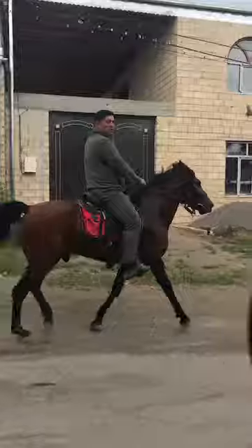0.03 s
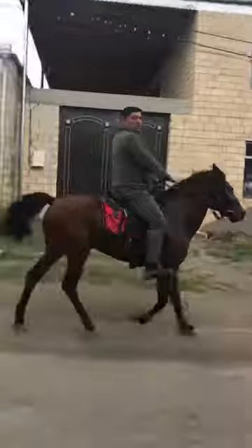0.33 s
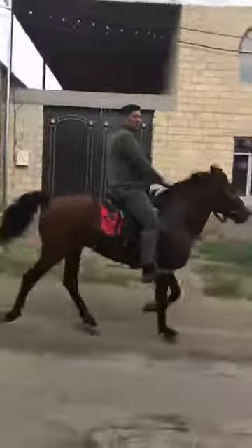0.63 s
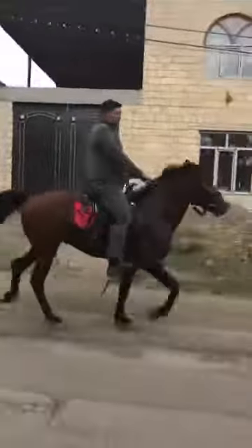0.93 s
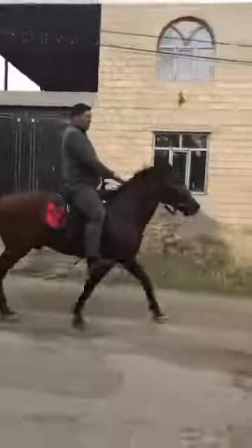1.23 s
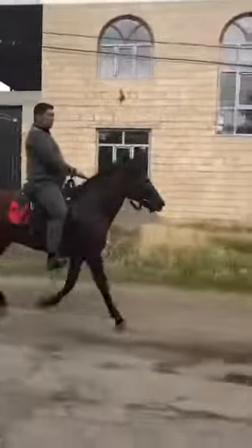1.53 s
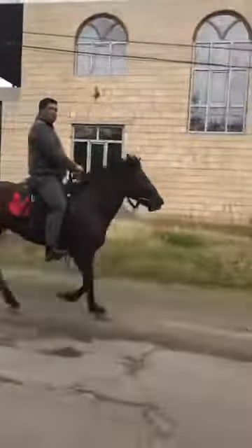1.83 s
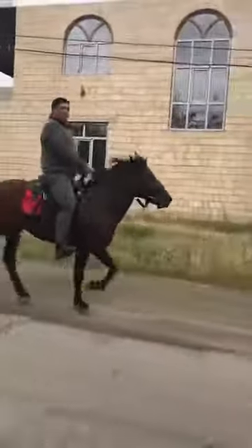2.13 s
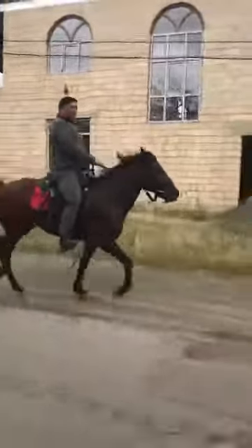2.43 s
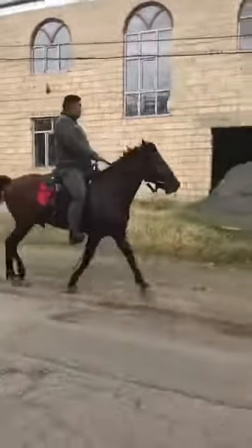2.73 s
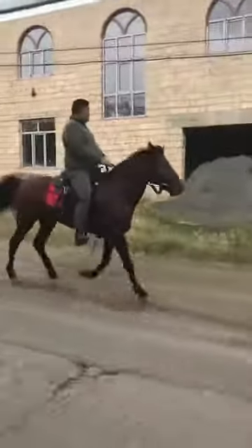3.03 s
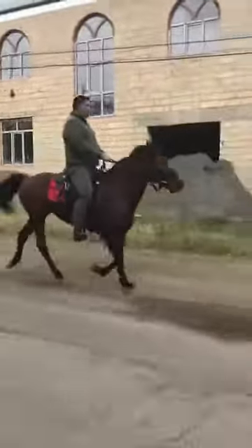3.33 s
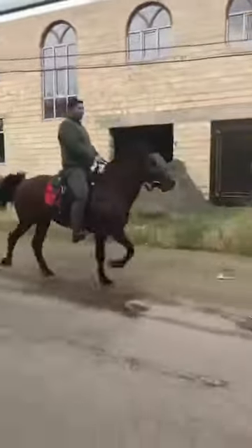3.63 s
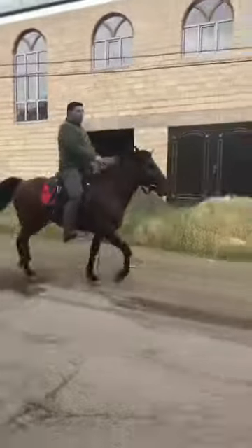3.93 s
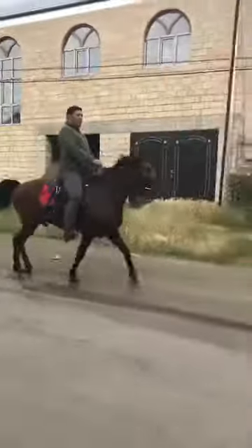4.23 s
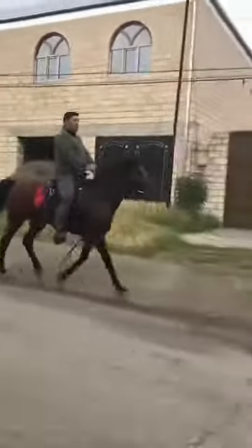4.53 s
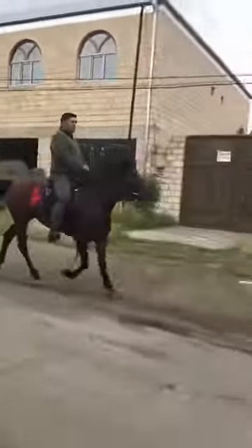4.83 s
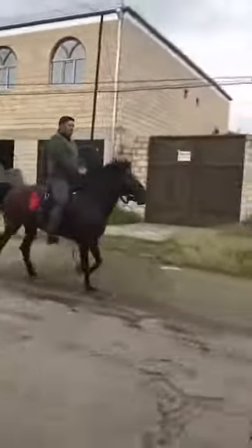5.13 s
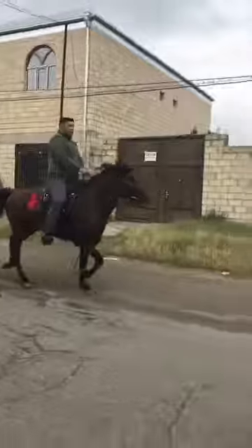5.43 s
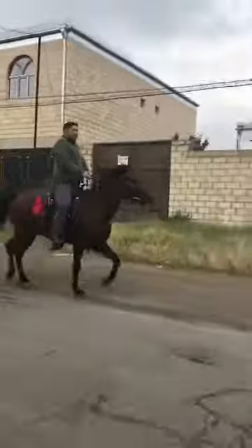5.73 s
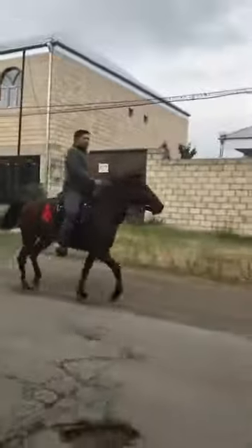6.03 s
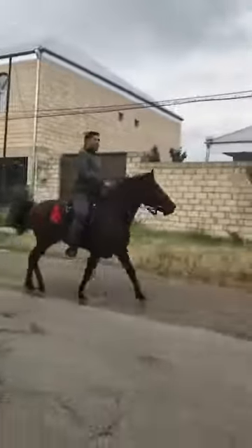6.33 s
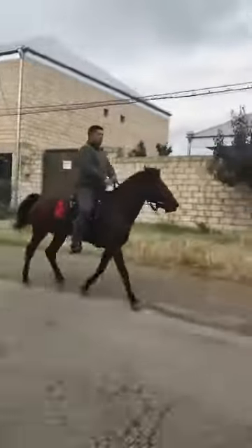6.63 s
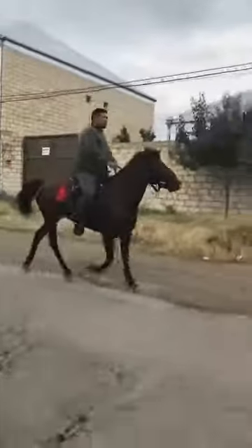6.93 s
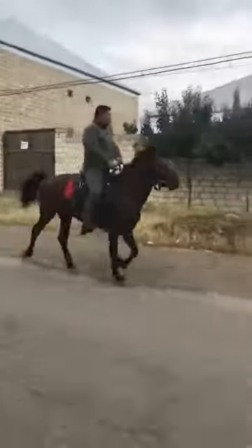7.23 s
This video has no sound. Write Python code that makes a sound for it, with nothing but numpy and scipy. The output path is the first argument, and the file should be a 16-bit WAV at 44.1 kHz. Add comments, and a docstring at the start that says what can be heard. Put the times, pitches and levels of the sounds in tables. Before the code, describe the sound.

From the start, a car's low engine drone and tyre noise run steadily, heard from inside, a little stronger in the first half second. Beside it, a shod horse keeps a quick, even gait on gritty asphalt, with about four closely paired footfalls a second. The steps mix sandy scrapes, hollow knocks and sharp iron clacks, followed by faint ticks of loose stones. A tiny, very high bell jingles in time throughout, and the house fronts add a slight, short echo. Harness buckles snap at about 1, 2.8 and 4 to 4.5 seconds. A small distant bird gives thin, faint whistles between 2.4 and 5 seconds. One clack stands out at 1.5 seconds, and the hooves strike hardest between 6.2 and 6.9 seconds. Soft gusts bump the microphone around 0.5, 5.6 and 6.6 seconds, with a short, hard wind thump at 7.3 seconds.

```python
"""A car drones along a gritty asphalt street, and a shod horse ambles beside it.
From the first step the shoes grind through grit and clack down heel and toe, ringing horn and iron;
loose stones tick back, and a tiny bell on the tack is shaken twice a step.
Soon gusts bump the microphone and harness buckles snap; later a small bird whistles far off.
The house fronts return a short echo, and the hardest gust comes near the end."""
import sys
import numpy as np
from scipy import signal
from scipy.fft import rfft, irfft, next_fast_len
from scipy.io import wavfile
from scipy.ndimage import uniform_filter1d

SR = 44100
rng = np.random.default_rng(int(sys.argv[2]) if len(sys.argv) > 2 else 0)


def store_wav(level_fs):
    """Save 16-bit WAV to argv[1]."""
    pcm = np.round(np.clip(np.atleast_2d(level_fs), -1, 1) * 32767)
    wavfile.write(sys.argv[1], SR, pcm.T.astype(np.int16))


N = 329427


def from_db(db):
    """Decibels to amplitude ratio."""
    return 10 ** (np.asarray(db) / 20)


def rms_one(x):
    """Normalisation to unit power."""
    return x / np.sqrt(np.mean(x ** 2) + 1e-20)


def seconds(size):
    """A time axis."""
    return np.arange(size) / SR


def in_time(rows):
    """Linear interpolation of each column at every sample."""
    s, *columns = np.transpose(rows)
    return [np.interp(seconds(N), s, c) for c in columns]


def add(out, s, sound):
    """Superposition: a sound is mixed in at its time."""
    at = max(int(s * SR), 0)
    out[at:at + len(sound)] += sound[:max(N - at, 0)]


def cut(x, hz, kind, order=2):
    """Butterworth filter."""
    return signal.sosfilt(signal.butter(order, hz, kind, fs=SR, output="sos"), x)


def colour(x, spectrum):
    """Spectral shaping over log frequency, at unit power."""
    hz, db = np.transpose(spectrum)
    size = next_fast_len(len(x))
    log_hz = np.log(np.fft.rfftfreq(size, 1 / SR) + 1)
    gain = from_db(np.interp(log_hz, np.log(hz), db, -80, -80))
    return rms_one(irfft(rfft(x, size) * gain, size)[:len(x)])


def drift(rate, size):
    """Random modulation: Gaussian values, `rate` a second, joined by lines."""
    steps = seconds(size) * rate
    count = int(steps[-1]) + 2
    return np.interp(steps, np.arange(count), rng.standard_normal(count))


def even(x, span_s):
    """Envelope flattening: division by the running RMS."""
    power = np.abs(uniform_filter1d(x ** 2, max(int(span_s * SR), 2)))
    return x / np.sqrt(power + 1e-12)


def grains(per_s, spread_db, size):
    """Shot noise: random clicks of uneven size."""
    sizes = from_db(spread_db * np.minimum(rng.exponential(1, size), 4)) * rng.choice([-1, 1], size)
    return sizes * (rng.random(size) < per_s / SR)


def ring(push, modes, detune, spread_db):
    """Modal synthesis: a push rings damped resonators, each at a slightly random pitch and strength."""
    out = 0
    for hz, db, t60 in modes:
        r = from_db(-60 / (t60 * SR))
        w = 2 * np.pi * hz * np.exp(detune * rng.normal()) / SR
        gain = from_db(db + spread_db * rng.normal()) * rng.choice([-1, 1])
        out = out + gain * signal.lfilter([1, -np.cos(w)], [1, -2 * r * np.cos(w), r * r], push + 1e-18)
    return out


# relative levels of the rolling car: (time [s], cabin drone [dB], tyre roar [dB], street hiss [dB])
CAR_LEVELS = [(0.1, -28, -28, -41.5), (0.3, -31, -33.5, -40), (0.7, -25.5, -35.5, -43),
              (1.5, -32, -35.5, -46.5), (2.4, -28, -40, -47.5), (4.2, -29, -38, -50.5),
              (5.1, -29.5, -38.5, -48), (7.2, -31, -41.5, -50.5)]
# engine firing tone: (time [s], frequency [Hz], level [dB])
FIRING_TONE = [(0.1, 51.07, -24.5), (0.2, 48.37, -21), (0.5, 49.33, -20.5), (0.65, 48.55, -43),
               (1.2, 49.62, -27), (2.3, 52, -33), (7.4, 47, -42)]
# spectra of the cabin and of tyres on asphalt: (frequency [Hz], relative density [dB])
CABIN_SPECTRUM = [(20, -46), (30, -16.5), (40, -5.5), (49, 2.5), (62, -6.5), (85, -8), (120, -19),
                  (170, -17), (300, -29)]
TYRE_SPECTRUM = [(76, -2), (130, -0.5), (291, -5), (462, -12.5), (846, -15), (1060, -14.5), (2090, -22),
                 (3530, -24), (4980, -29.5), (5620, -28), (10300, -38), (11100, -38), (14500, -38),
                 (16000, -50)]


def car(drone_db=-3, tyre_db=1, hiss_db=-1, harmonic_db=-13, split_hz=1200):
    """Cavity resonance: the cabin booms near the firing rate, over the rolling noise of the tyres."""
    drone, tyres, hiss = in_time(CAR_LEVELS)
    hz, engine_db = in_time(FIRING_TONE)
    phase = 2 * np.pi * np.cumsum(hz * (1 + 0.026 * drift(rate=9, size=N))) / SR
    engine = from_db(engine_db) * (np.sin(phase) + from_db(harmonic_db) * np.sin(2 * phase))
    boom = from_db(drone + drone_db) * even(colour(rng.standard_normal(N), CABIN_SPECTRUM), span_s=0.16)
    rolling = colour(rng.standard_normal(N), TYRE_SPECTRUM)
    roar = from_db(tyres + tyre_db) * rms_one(cut(rolling, split_hz, "low"))
    crackle = colour(grains(per_s=12000, spread_db=6, size=N), TYRE_SPECTRUM)
    fizz = from_db(hiss + hiss_db) * rms_one(cut(crackle, split_hz, "high"))
    flicker = from_db(2.3 * drift(rate=66, size=N))
    return engine + boom + roar + fizz * flicker


# the amble lands two hooves in quick succession, and the jolt reaches the bell later; relative levels:
# (time [s], leading scuff [dB], trailing lag [s], trailing scuff [dB], bell lag [s], bell [dB])
GAIT = [(.198, -35.5, 0.062, -38, 0.058, -32), (.447, -38, 0.053, -37.5, 0.11, -34),
        (.688, -38.5, 0.063, -37, 0.056, -32), (0.951, -42.5, 0.054, -39.5, 0.094, -31),
        (1.185, -41, 0.068, -39, 0.053, -34.5), (1.445, -38.5, 0.074, -39.5, 0.082, -30),
        (1.676, -36.5, 0.054, -37, 0.076, -37), (1.932, -39.5, 0.046, -37, 0.04, -37),
        (2.172, -37.5, .056, -38, 0.044, -47), (2.428, -40.5, 0.047, -39.5, 0.09, -27.5),
        (2.669, -42, 0.057, -38.5, 0.078, -36), (2.933, -40.5, 0.045, -43, 0.088, -38),
        (3.170, -39.5, 0.045, -39, 0.083, -43), (3.431, -44, 0.036, -50, 0.1, -38),
        (3.675, -36, 0.036, -40.5, 0.03, -40), (3.935, -40, 0.04, -45.5, 0.043, -35.5),
        (4.189, -35.5, 0.04, -42, 0.024, -45), (4.452, -40.5, 0.033, -42, 0.091, -36.5),
        (4.690, -35.5, 0.034, -38.5, 0.094, -43), (4.964, -40, 0.048, -39.5, 0.085, -41),
        (5.152, -53, 0.055, -32.5, 0.14, -40), (5.406, -47, .058, -35.5, .149, -43),
        (5.721, -35.5, 0.046, -46, 0.047, -44), (5.987, -34, 0.034, -37, 0.11, -38),
        (6.239, -43, .040, -35.5, .108, -39), (6.516, -40.5, 0.023, -40.5, 0.1, -54),
        (6.760, -42, .046, -35, 0.081, -42), (7.046, -40, 0.019, -39, 0.081, -43),
        (7.257, -35, 0.07, -34.5, 0.12, -36.5)]
# fine sand on the road: (time [s], hiss relative to crunch [dB])
SAND_BALANCE = [(0.2, -4), (1.1, 0.5), (2.8, 0), (4.2, -2), (5.0, -6.5), (6.6, -4), (7.3, -5.5)]
# a toe drags over the road: (start [s], end [s], relative crunch [dB], relative hiss [dB])
TOE_DRAGS = [(0.985, 1.04, -43, -38), (3.502, 3.515, -27.5, -31.5), (5.752, 5.778, -33, -43),
             (6.534, 6.575, -33, -41.5), (7.22, 7.299, -41, -35)]


def slides(lead_s=0.018, trail_s=0.046):
    """Sliding contact, twice a step and in each drag: (start [s], end [s], crunch [dB], hiss [dB])."""
    rows = []
    for s, lead_db, lag, trail_db, _, _ in GAIT:
        sand_db = np.interp(s, *np.transpose(SAND_BALANCE))
        for start, length, crunch in (s, lead_s, lead_db), (s + lag, trail_s, trail_db):
            rows.append((start, start + length, crunch, crunch + sand_db))
    return rows + list(TOE_DRAGS)


# spectra of cracking grit and of swept sand: (frequency [Hz], relative density [dB])
GRIT_SPECTRUM = [(300, -16), (650, -3), (1100, 5.5), (1900, 2.5), (3000, 4), (4200, 1.5), (6500, -17.5),
                 (9000, -49), (15000, -64)]
SAND_SPECTRUM = [(3000, -56), (5500, 11.5), (8000, 9.5), (10500, 5), (13000, 5.5), (16000, -2)]


def scuffs(rise_s=0.0015, fall_s=0.006, crunch_db=1, sand_db=1.5, stutter_db=9, patch_db=5):
    """Friction noise: the shoe stutters over the road, cracking coarse grit and sweeping fine sand."""
    out, t = np.zeros(N), seconds(size=6000)
    for start, end, crunch, hiss in slides():
        release = np.exp(-np.maximum(t - (end - start - rise_s), 0) / fall_s)
        slide = (1 - np.exp(-t / rise_s)) * release
        stutter = from_db(stutter_db * np.minimum(drift(rate=180.3, size=len(t)), 1))
        stutter /= np.sqrt(np.average(stutter ** 2, weights=slide ** 2))  # conserves the slide's energy
        road_patch = [(hz, db + patch_db * rng.normal()) for hz, db in GRIT_SPECTRUM]
        grit = stutter * colour(grains(per_s=2200, spread_db=3.3, size=len(t)), road_patch)
        sand = np.sqrt(stutter) * colour(grains(per_s=8000, spread_db=3, size=len(t)), SAND_SPECTRUM)
        add(out, start, slide * (from_db(crunch + crunch_db) * grit + from_db(hiss + sand_db) * sand))
    return out


# loud clacks of a shod hoof, heel or toe:
# (time [s], relative iron clack [dB], relative horn knock [dB], horn pitch [Hz])
HARD_HOOF_STRIKES = [(0.2119, -19.5, -23, 1140), (0.7467, -17, -30, 1280), (0.7785, -19, -30, 1320),
                     (0.8228, -26, -29, 980), (1.0213, -19.5, -35, 1080), (1.1831, -23, -27.5, 770),
                     (1.1986, -23.5, -26, 1330), (1.3024, -26, -38, 1340), (1.4978, -6.5, -34, 1000),
                     (1.6678, -25, -31, 820), (1.7254, -18, -38, 1074), (2.2521, -14, -36, 1000),
                     (2.441, -19, -32, 1270), (2.6602, -21.5, -25, 1040), (2.6797, -19, -42, 1062),
                     (2.7182, -24, -35, 859), (2.7633, -20.5, -31, 1260), (3.0097, -20.5, -27, 1107),
                     (3.1605, -28, -21, 1064), (3.2335, -20.5, -30, 1070), (3.3106, -39, -29, 1040),
                     (3.5027, -19.5, -29.5, 1018), (3.681, -20, -31.5, 1080), (3.9938, -23, -41, 1090),
                     (4.2698, -18, -32.5, 1330), (4.3301, -26.5, -51, 1346), (4.6819, -26.5, -23.5, 920),
                     (5.0245, -26.5, -24.5, 1050), (5.1528, -21, -28.5, 930), (5.222, -26, -25, 1080),
                     (5.7393, -15, -27.5, 944), (5.7774, -35, -30, 1230), (6.0422, -25.5, -45, 1030),
                     (6.2307, -12, -28, 1630), (6.2495, -9, -20.5, 1159), (6.3049, -23, -30, 958),
                     (6.314, -16, -39, 1280), (6.3807, -17, -28.5, 990), (6.4251, -14.5, -24, 1290),
                     (6.5155, -21, -28.5, 990), (6.7478, -6.5, -20.5, 1012), (6.7633, -9.5, -24.5, 1350),
                     (6.8051, -8, -31, 1240), (6.8513, -18, -35, 1310), (7.0655, -19.5, -28.5, 1560),
                     (7.258, -15, -24, 1710), (7.3173, -13.5, -30, 723)]
HORN_HZ = 1037   # the horn's usual pitch


def contacts(soft_lag_s=0.0098, soft_clack_db=-36, soft_knock_db=-39.5, tap_lag_s=.016, tap_loss_db=13):
    """Impacts: every hoof lands softly; a weaker tap follows each hard strike. Columns as above."""
    soft = [(start + soft_lag_s, soft_clack_db, soft_knock_db, HORN_HZ)
            for s, _, lag, *_ in GAIT for start in (s, s + lag)]
    taps = [(s + tap_lag_s * rng.uniform(.75, 1.25), clack - tap_loss_db, knock - tap_loss_db, HORN_HZ)
            for s, clack, knock, _ in HARD_HOOF_STRIKES]
    return soft + list(HARD_HOOF_STRIKES) + taps


# modes of the hoof horn and of the iron shoe: (frequency [Hz], relative level [dB], T60 [s])
HORN_MODES = [(430, -12, .009), (640, -7, .009), (860, -5, .009), (1050, 1, .012), (1270, -4, .008),
              (1680, -11, .005)]
SHOE_MODES = [(2800, 10, 0.0076), (3960, 6, 0.0046), (3910, 9, 0.0044), (5450, -35, 0.0017),
              (5680, 6, 0.0063), (8150, 0, 0.00085)]


def hoof_strikes(crush_s=0.0014, settle_s=0.0056, crack_db=-2, knock_db=-2.3, clack_db=-11.5):
    """Impact excitation: one contact, crushed stones and a short settling ring both horn and shoe."""
    out, t = np.zeros(N), seconds(size=2600)
    attack = t < .005
    crushing = 0.38 * np.exp(-t / crush_s) + 0.072 * np.exp(-t / settle_s)
    for s, clack, knock, pitch in contacts():
        push = rng.standard_normal(len(t)) * crushing
        push[0] += 1  # the contact impulse
        modes = [(hz * pitch / HORN_HZ, db, t60) for hz, db, t60 in HORN_MODES]
        horn = cut(ring(push, modes, detune=.06, spread_db=3), [280, 2000], "band")
        shoe = rms_one(ring(push, SHOE_MODES, detune=.1, spread_db=3))
        crack = from_db(crack_db) * rms_one(cut(push, 6500, "low", order=3))  # stones have no pitch
        iron = cut(shoe + crack, 2400, "high")
        add(out, s, from_db(knock + knock_db) * horn / horn[attack].std())
        add(out, s, from_db(clack + clack_db) * iron / iron[attack].std())
    return out


def loose_grit(level_db=-57, tick_s=0.0033, low_hz=1300, top_hz=7000, scatter_s=0.17):
    """Decaying shot noise: stones kicked up by each scuff tick back on the road, ever more faintly."""
    scatter, t = np.zeros(N), seconds(size=14000)
    for _, end, _, _ in slides():
        add(scatter, end, np.exp(-t / scatter_s))
    stones = scatter * grains(per_s=80, spread_db=1.8, size=N)
    decays = signal.lfilter([1], [1, -np.exp(-1 / (tick_s * SR))], stones + 1e-18)
    ticks = cut(decays * rng.standard_normal(N), low_hz, "high", order=1)
    return from_db(level_db) * rms_one(cut(ticks, top_hz, "low", order=1))


def shakes(swing_s=.056, mid_swing_s=.078, loss_db=10.5):
    """Forced oscillation: a hard and a weak shake at the swing's two ends: (time [s], level [dB])."""
    rows = []
    for s, *_, lag, db in GAIT:
        swing = swing_s if lag < mid_swing_s else -swing_s
        rows += [(s + lag, db), (s + lag + swing, db - loss_db)]
    return rows


def jingle(push, modes):
    """Resonance of small steel parts under a rattle; unit power at the loudest moment."""
    tone = cut(ring(push, modes, detune=.004, spread_db=2.2), 4500, "high")
    return tone / np.sqrt(uniform_filter1d(tone ** 2, size=660).max())


# modes of the bell and of the steel links it hangs from: (frequency [Hz], relative level [dB], T60 [s])
BELL_MODES = [(11000, -0.5, 0.059), (14040, 1, 0.014), (13200, -26, .02), (14500, 3.5, 0.027),
              (15360, -15, 0.018), (15200, -27, 0.014)]
LINK_MODES = [(5554, 8, 0.043), (6770, 7, .022), (7110, 13.5, 0.01), (7870, 3, 0.016), (7890, 4.5, 0.028),
              (8670, 5, 0.019)]


def bell(peak_s=0.0088, rattle_s=0.0033, tremble_db=-54, gain_db=2, links_db=-29, links_share=0.37):
    """Repeated impacts: the pellet skitters round the shell, then trembles on; the links chink along."""
    out, t = np.zeros(N), seconds(size=10000)
    swell = np.exp(-.5 * ((t - peak_s) / rattle_s) ** 2)
    for s, db in shakes():
        tremble = np.exp(-t / .045) * from_db(3 * drift(rate=60, size=len(t)))
        tremble *= min(from_db(tremble_db - db), .5)  # its loudness hardly depends on the shake
        push = grains(per_s=3500, spread_db=2.5, size=len(t)) * (swell + tremble)
        links = from_db(links_db + links_share * db) * jingle(push, LINK_MODES)
        shell = from_db(db + gain_db) * jingle(push, BELL_MODES)
        add(out, s - peak_s / 2, shell + links)
    return out


# gusts on the microphone: (time [s], half length [s], level [dB])
WIND_GUSTS = [(0.45, 0.032, -26), (5.612, 0.031, -24), (6.582, 0.05, -27.5), (7.301, 0.012, -9.5),
              (7.444, 0.012, -29)]
# spectrum of the turbulence: (frequency [Hz], relative density [dB])
GUST_SPECTRUM = [(25, -20), (50, -5), (75, 0), (115, 0), (165, -15), (240, -11), (330, -19), (500, -28),
                 (900, -45)]


def wind(brighten=0.42):
    """Turbulent pressure at the microphone port; only a hard gust reaches far above the bass."""
    swell = sum(from_db(db) * np.exp(-.5 * ((seconds(N) - s) / half) ** 2) for s, half, db in WIND_GUSTS)
    lumps = even(colour(rng.standard_normal(N), GUST_SPECTRUM), span_s=0.021)
    bass = colour(lumps, spectrum=[(20, 0), (120, 0), (300, -24), (1000, -50)])
    force = (swell / swell.max()) ** brighten
    return swell * ((1 - force) * bass + force * lumps)


# harness buckles snap: (time [s], level [dB])
BUCKLE_SNAPS = [(0.9278, -26), (1.1528, -31), (2.806, -21.5), (3.923, -27.5), (4.1354, -22.5),
                (4.151, -23.5), (4.4305, -33), (4.437, -22.5)]


def buckles(decay_s=0.0016, low_hz=4500, faint_db=-35, faint_count=24):
    """Broadband transients: tiny bright snaps of the harness, with fainter ones at random times."""
    out, t = np.zeros(N), seconds(size=400)
    faint = [(rng.random() * N / SR, faint_db + 3 * rng.normal()) for _ in range(faint_count)]
    for s, db in list(BUCKLE_SNAPS) + faint:
        add(out, s, from_db(db) * rng.standard_normal(len(t)) * np.exp(-t / decay_s))
    return cut(out, low_hz, "high", order=1)


# bird calls: (time [s], length [s], start pitch [Hz], middle pitch [Hz], end pitch [Hz], level [dB])
WHISTLES = [(2.41, .07, 5400, 6200, 5700, -51), (2.65, .075, 6300, 6800, 5500, -49),
            (3.425, .07, 5550, 5600, 5250, -46), (3.64, .08, 5500, 6100, 5200, -47),
            (4.10, .04, 5400, 5700, 5400, -46), (4.145, .04, 5700, 5650, 4800, -46),
            (4.76, .085, 5000, 5250, 4100, -48), (4.96, .07, 5600, 6600, 6100, -51)]


def bird():
    """Frequency modulation: each thin whistle follows an arch and flutters in pitch and level."""
    out = np.zeros(N)
    for s, length, first, middle, last, db in WHISTLES:
        size = int(length * SR)
        progress = np.linspace(0, 1, size)
        hz = np.polyval(np.polyfit([0, .5, 1], [first, middle, last], 2), progress)
        hz *= 1 + .022 * drift(rate=90, size=size) + .014 * drift(rate=700, size=size)
        envelope = np.sqrt(np.abs(np.sin(np.pi * progress)))
        level = from_db(db + 3 * drift(rate=150, size=size)) * envelope
        add(out, s, level * np.sin(2 * np.pi * np.cumsum(hz) / SR))
    return out


def street(x, tail_db=-14, t60=.16, dull_hz=7000):
    """Reverberation: road and house fronts scatter back a thin, short tail."""
    t = seconds(size=20000)
    echo = rng.standard_normal(len(t)) * from_db(-60 * t / t60)
    echo *= from_db(tail_db) / np.linalg.norm(echo)
    return x + cut(signal.fftconvolve(x, echo)[:N], dull_hz, "low", order=1)


def scene():
    """Superposition: horse and bird in the street, car and wind at the microphone."""
    horse = hoof_strikes() + scuffs() + loose_grit() + bell() + buckles()
    return (street(horse + bird()) + car() + wind())[None]


def record(dry, start_s=0.082, cutoff_hz=16000):
    """Saturation and band limiting: the microphone opens, peaks are rounded and the top is cut."""
    opened = np.clip((seconds(N) - start_s) / .004, .01, 1)
    low_pass = signal.ellip(10, .2, 70, cutoff_hz, fs=SR, output="sos")
    return signal.sosfilt(low_pass, np.tanh(dry * opened))


dry = scene()
out = record(dry)
store_wav(out)
```